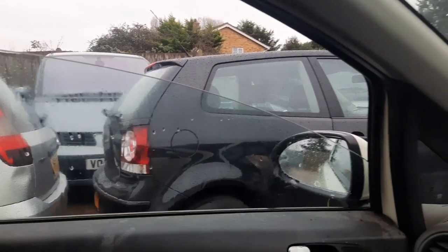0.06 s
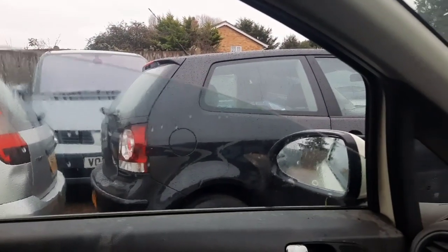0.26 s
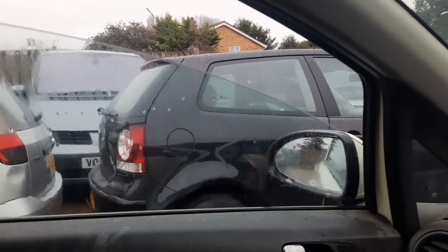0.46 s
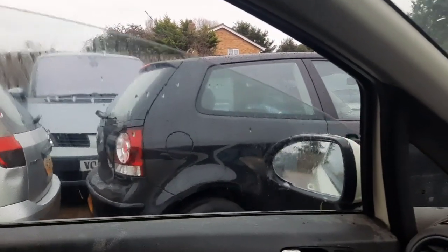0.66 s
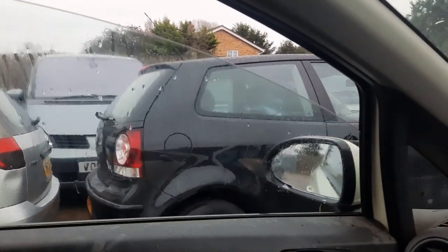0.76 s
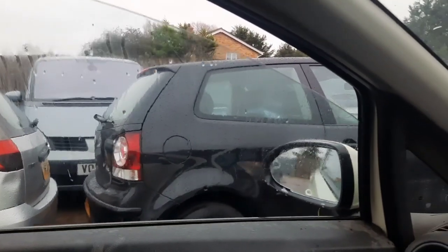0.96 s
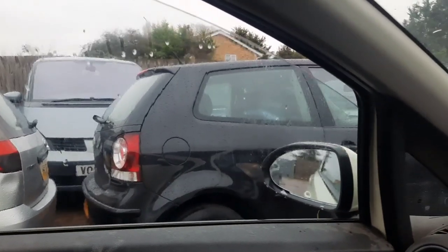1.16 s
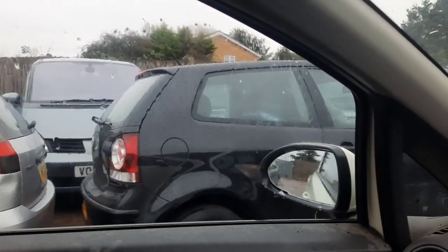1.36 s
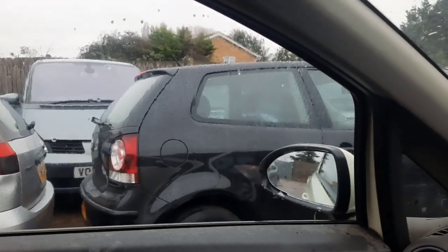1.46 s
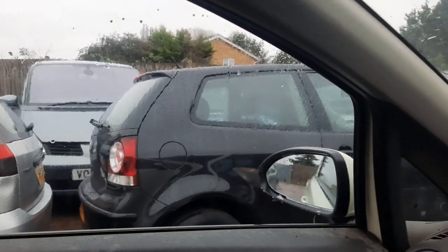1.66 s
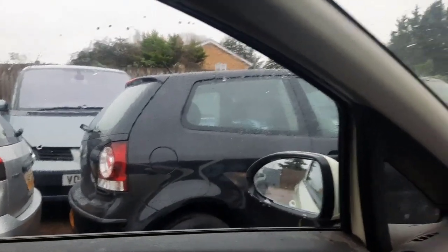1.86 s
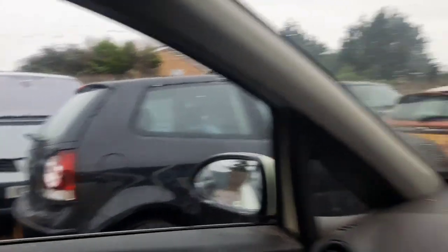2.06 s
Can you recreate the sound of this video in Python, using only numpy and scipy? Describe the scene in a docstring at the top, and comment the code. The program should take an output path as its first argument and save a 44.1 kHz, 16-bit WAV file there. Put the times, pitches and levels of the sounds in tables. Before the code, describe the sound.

An electric car window motor whines as the glass slides up and thuds shut, engine idling

```python
"""A small motor winds up a window inside a parked car: harmonics of the shaft rate make its whine.
Gears grind, and the glass hisses through its seals as filtered noise that jumps at random slips.
The lift takes up its slack with knocks and the pane thuds home: impulses ring damped modes.
Two switch clicks come before the run and one after; faint ticks and a low sway follow the thud.
A three-cylinder engine idles as a pulse train through resonances, under a bed of cabin noise."""
import sys
import numpy as np
from scipy import signal
from scipy.io import wavfile

SR = 44100
rng = np.random.default_rng(int(sys.argv[2]) if len(sys.argv) > 2 else 0)


def rack_gain(trim_db):
    """Turn a fader trim in dB into the linear factor to multiply a signal by."""
    fader = np.asarray(trim_db, float)
    return 10 ** (fader / 20)


def output_pcm(signal):
    """Save a mono or channel-first signal as 16-bit PCM at the path in sys.argv[1].

    Samples are clipped to [-1, 1] before scaling.
    """
    pcm = np.clip(np.atleast_2d(signal).T, -1, 1) * 32767
    wavfile.write(sys.argv[1], SR, np.round(pcm).astype(np.int16))


N = 92610
T = np.arange(N) / SR
MOTOR_STOP_S = 1.503


def rms_one(x):
    """Normalisation: scales a signal to unit rms."""
    return x / np.sqrt(np.mean(x ** 2) + 1e-20)


def in_time(rows):
    """Linear interpolation: the columns of a time curve at every sample."""
    s, *columns = np.transpose(rows)
    return [np.interp(T, s, column) for column in columns]


def gate(start, stop, rise, fall):
    """Envelope: a linear rise that ends at the start, exponential decay after the stop (all in s)."""
    return np.clip((T - start) / rise + 1, 0, 1) * np.exp(-np.maximum(T - stop, 0) / fall)


def at_hz(points, hz):
    """Spectral envelope: interpolates a table along log frequency."""
    table_hz, value = np.transpose(points)
    return np.interp(np.log(hz), np.log(table_hz), value)


def drift(rate_hz):
    """Slow random modulation of unit rms: low-passed noise, made at every 40th sample."""
    r = np.exp(-2 * np.pi * rate_hz * 40 / SR)
    noise = rng.standard_normal(N // 40 + 2002)
    slow = signal.lfilter([1], [1, -2 * r, r * r], noise)[2000:]
    return np.interp(np.arange(N) / 40, np.arange(len(slow)), rms_one(slow - slow.mean()))


def strike(events, modes, spread_db):
    """Modal synthesis: each blow excites every damped mode by its own amount, unlike at each ear."""
    ear_spread_db = 1
    s, db, hardness = np.transpose(events)
    luck = rng.standard_normal((len(s), len(modes)))
    ear_luck = rng.standard_normal((len(s), len(modes)))
    out = 0
    for k, (hz, mode_db, t60) in enumerate(modes):
        impulses = np.full((2, N), 1e-18)  # not quite silent
        # hardness tilts the spectrum in dB per octave about the second mode
        blow_db = db + mode_db + hardness * np.log2(hz / modes[1][0]) + spread_db * luck[:, k]
        for ear, sign in enumerate((-1, 1)):
            size = rack_gain(blow_db + sign * ear_spread_db * ear_luck[:, k])
            np.add.at(impulses[ear], np.clip(s * SR, 0, N - 1).astype(int), size)
        r = rack_gain(-60 / (t60 * SR))
        w = 2 * np.pi * hz / SR
        ring = signal.lfilter([0, np.sin(w)], [1, -2 * r * np.cos(w), r * r], impulses)
        out = out + (-1) ** k * ring
    return out


def banded_noise(spectrum, patchy_db, shared_db, top_db=0, top_hz=9500):
    """Subtractive synthesis: third-octave noise bands, each with its own flicker and ear correlation."""
    # correlation of the ears: hz, likeness
    likeness = [(40, 0.68), (130, 0.77), (280, 0.94), (500, 0.81), (1100, 0.01), (2000, -0.11),
                (16000, -0.1)]
    # balance of the ears: hz, left_over_right_db
    left_over_right = [(40, -0.2), (1000, 1), (4000, .1), (8000, 0.5), (13000, 4.5)]
    low_hz, high_hz = spectrum[0][0], spectrum[-1][0]
    edges = np.geomspace(low_hz, high_hz, int(3 * np.log2(high_hz / low_hz)) + 2)
    together = drift(34)
    white = rng.standard_normal((2, 2, N))  # neighbouring bands take different noise
    out = 0
    for k, (low, high) in enumerate(zip(edges, edges[1:])):
        band = signal.butter(2, [low, high], "band", fs=SR, output="sos")
        mid, side = signal.sosfilt(band, white[k % 2])
        hz = np.sqrt(low * high)
        alike = np.clip(at_hz(likeness, hz), -1, 1)
        level_db = at_hz(spectrum, hz) + shared_db * together + patchy_db * drift(7.2)
        gain = rack_gain(level_db + top_db * (hz > top_hz))
        pan = rack_gain(at_hz(left_over_right, hz) * np.array([[0.5], [-0.5]]))
        stereo = np.sqrt(1 + alike) * mid + np.sqrt(1 - alike) * side * [[1], [-1]]
        out = out + gain * pan * stereo
    return out / np.sqrt(np.mean(out.mean(axis=0) ** 2))


def cabin_air():
    """Broadband background noise: a fixed spectrum whose hiss above 2 kHz varies slowly in level."""
    # spectrum of the background: hz, level_db_per_hz
    air_spectrum = [(15, -39), (25, -8), (145, -3), (190, -27.5), (317, -2.5), (439, -18.5), (887, -24.5),
                    (1060, -23.5), (1940, -32), (7400, -34), (9400, -45), (11500, -38.5), (16000, -40)]
    # hiss above 2 kHz: time_s, level_db
    hiss_curve = [(0, -3), (0.22, -3), (1.55, 2), (2.1, -0.5)]
    hiss_db, = in_time(hiss_curve)
    noise = banded_noise(air_spectrum, patchy_db=0.7, shared_db=0.4, top_db=hiss_db, top_hz=2000)
    return rack_gain(-45.5) * noise


def engine():
    """Source and filter: one pulse a firing, uneven by cylinder, into exhaust and body resonances."""
    # resonances of exhaust and body: hz, level_db, t60_s
    path_modes = [(49.3, -1.5, 0.1), (68.7, -11.5, 0.95), (82, -10, 0.21), (128.2, -2.5, 0.15),
                  (169, -9.5, 0.05), (255.9, -11, 0.33), (322, -14.5, 0.027), (380, -18.5, 0.068)]
    # strength of each cylinder in turn: level_db
    cylinder_db = [0, -1.5, -0.7]
    firing_hz, jitter_s = 20.9, 0.0013
    k = np.arange(int(N / SR * firing_hz))
    s = (k + 0.3015) / firing_hz + jitter_s * rng.standard_normal(len(k))
    pulses = np.transpose([s, np.array(cylinder_db)[k % 3], 0 * s])
    return rack_gain(-46) * rms_one(strike(pulses, path_modes, spread_db=1.5))


def cabin(x):
    """Reverberation: convolution with dense, exponentially decaying reflections, other ones at each ear."""
    t60_s, wet_db = 0.12, -9
    t = np.arange(SR // 5) / SR
    tails = rng.standard_normal((2, len(t))) * rack_gain(-60 * t / t60_s) * (t > 0.002)
    tails /= np.sqrt((tails ** 2).sum(axis=1, keepdims=True))
    return x + rack_gain(wet_db) * signal.fftconvolve(x, tails, axes=1)[:, :N]


def ticks():
    """Transients: high-passed noise snaps with a decay constant of 0.8 ms."""
    # faint ticks after the stop: start_s, level_db
    tick_times = [(1.7016, -48), (1.7774, -49), (1.952, -51)]
    shape = sum(rack_gain(db) * np.exp(-np.clip(T - s, 0, 1) / 0.0008) * (T > s) for s, db in tick_times)
    treble = signal.butter(2, 7000, "high", fs=SR, output="sos")
    return signal.sosfilt(treble, shape * rng.standard_normal((2, N)))


def sway():
    """Low resonance of the door skin: a sine that swells after the thud, holds and decays."""
    # ring of the door skin: start_s, pitch_hz, level_db, hold_s, t60_s
    start, hz, db, hold, t60 = (1.585, 61, -31.5, .075, .16)
    t = np.maximum(T - start, 0)
    swell = 1 - np.exp(-t / 0.02)
    return rack_gain(db - 60 * np.maximum(t - hold, 0) / t60) * swell * np.sin(2 * np.pi * hz * t)


def switch():
    """Impulsive excitation: each click is a broadband noise snap with a fast exponential decay."""
    # clicks: start_s, level_db, t60_s, lift_above_3_khz_db
    clicks = [(0.157, -58, .03, 5), (0.1758, -44, .045, 5), (1.9862, -39.5, .06, -8)]
    # spectrum of a click: hz, level_db_per_hz
    click_spectrum = [(400, -18), (800, -4), (1700, -2), (2800, -6), (4200, -1), (5600, -6), (7500, -9),
                      (9300, -14), (12500, -12), (16000, -12)]
    shape = sum(rack_gain(db - 60 * np.clip(T - s, 0, 1) / t60) * (T > s) for s, db, t60, _ in clicks)
    lift_db = np.interp(T, [c[0] for c in clicks], [c[3] for c in clicks])
    return shape * banded_noise(click_spectrum, patchy_db=0, shared_db=0, top_db=lift_db, top_hz=3000)


def lift_knocks():
    """Impact excitation: the lift takes up its slack in blows that ring its modes."""
    # blows of the lift: start_s, level_db, hardness_db_per_octave
    knocks = [(0.2288, -31.5, 6), (0.2325, -29.5, 2), (0.2384, -22.5, -1.5), (0.248, -36, 1),
              (0.2608, -33.5, -7)]
    # modes of the lift: hz, level_db, t60_s
    lift_modes = [(120, -9, 0.14), (334.6, 0.5, 0.073), (566, -5, 0.21), (816, -14, 0.057),
                  (995, -4.5, 0.037), (1160, -2, 0.015), (1310, -11, 0.05), (1460, -18.5, 0.056),
                  (1800, -15.5, 0.031), (2230, -23, 0.015)]
    return strike(knocks, lift_modes, spread_db=4.5)


def pane_thuds():
    """Impact excitation: the pane hits the frame and rebounds, ringing the modes of the door."""
    # blows of the pane: start_s, level_db, hardness_db_per_octave
    thuds = [(1.503, -17, -1.5), (1.514, -20, 2), (1.5255, -27, 1.5), (1.532, -24.5, 2),
             (1.5555, -22.5, -1)]
    # modes of the door: hz, level_db, t60_s
    door_modes = [(79, -0.5, 0.0994), (113.6, -0.5, 0.094), (143.2, 0, 0.12), (201.3, -3, 0.043),
                  (339, -7.5, 0.054), (535, -15, 0.028), (779, -23, 0.079), (897.5, -17.5, 0.023),
                  (1150, -28, 0.045)]
    return strike(thuds, door_modes, spread_db=2)


def seating():
    """Friction noise: the pane scrubs into the top seal, then a fainter diffuse settling."""
    # scrub and settling: start_s, end_s, level_db, settling_level_db, settling_end_s
    start, end, db, tail_db, tail_end = (1.508, 1.54, -43.5, -56, 1.665)
    scrub = rack_gain(db) * gate(start, end, 0.006, 0.008)
    settling = rack_gain(tail_db) * gate(start, tail_end, 0.006, 0.03)
    noise = rng.standard_normal(N) + 0.6 * rng.standard_normal((2, N))  # partly alike at the ears
    band = signal.butter(2, [450, 1400], "band", fs=SR, output="sos")
    crunch = signal.lfilter([1], [1, -0.9], signal.sosfilt(band, noise))
    return (scrub + settling) * rack_gain(1.5 * drift(60)) * rms_one(crunch)


def seals():
    """Stick-slip friction: bright hiss of glass on rubber that jumps up at each slip and decays."""
    # sliding glass: time_s, hiss_db, top_treble_db
    slide = [(0.24, -51, -6), (0.26, -51.5, -3.5), (0.314, -53.5, -4.5), (0.392, -47, -4.5),
             (0.449, -54.5, 0), (0.457, -44, -12), (0.504, -55.5, 1), (0.536, -50, -6), (0.554, -56, -0.5),
             (0.624, -55, -6), (0.638, -52, 1), (0.762, -56.5, -2.5), (0.979, -56, -1.5), (1.12, -50, -5.5),
             (1.198, -57, -2.5), (1.39, -47.5, -6), (1.488, -48, -1), (1.51, -50, -4.5)]
    # spectrum of the rubbing: hz, level_db_per_hz
    seal_spectrum = [(1300, -16), (2000, 0.5), (2900, -2), (3900, 3.5), (5400, -2), (6500, 6), (7700, -1.5),
                     (9200, -6.5), (11000, -8), (14000, -3), (16500, -4)]
    slips_per_s, slip_db, slip_s = 45, 1.8, 0.008  # the rubber grips and lets go
    db, top = in_time(slide)
    slips = (rng.random(N) < slips_per_s / SR) * rng.uniform(0.5, 2, N)
    db = db + slip_db * signal.lfilter([1], [1, -np.exp(-1 / (slip_s * SR))], slips)
    hiss = banded_noise(seal_spectrum, patchy_db=1.2, shared_db=0.3, top_db=top - top.mean())
    return rack_gain(db) * hiss * gate(slide[0][0], slide[-1][0], 0.026, 0.013)


def gears():
    """Structure-borne noise of gear and cable: a mid-range grind and a lumpy low judder of the door skin."""
    # gear and cable noise: time_s, grind_db (2.5 dB is added below), judder_db
    gear_run = [(0.275, -48.5, -37.5), (0.373, -53.5, -40), (0.403, -51.5, -33), (0.527, -51.5, -44),
                (0.593, -49.5, -33), (0.733, -51, -38.5), (0.759, -53.5, -30.5), (0.853, -50.5, -60),
                (1.009, -50, -43.5), (1.189, -50, -55), (1.225, -52.5, -66), (1.299, -52.5, -51),
                (1.429, -50.5, -40.5), (1.47, -48.5, -38.5)]
    # spectrum of the grind: hz, level_db_per_hz
    grind_spectrum = [(150, -48), (210, -26.5), (310, 0), (420, -12.5), (600, -7.5), (800, -7.5),
                      (1100, -16.5), (2200, -14.5), (3400, -31.5)]
    # spectrum of the judder: hz, level_db_per_hz
    judder_spectrum = [(28, -27), (45, 1.5), (110, 3), (150, -5), (210, -6.5), (300, -59)]
    grind_db, judder_db = in_time(gear_run)
    grind = rack_gain(grind_db + 2.5) * banded_noise(grind_spectrum, patchy_db=2.2, shared_db=0.66)
    judder = rack_gain(judder_db) * banded_noise(judder_spectrum, patchy_db=1, shared_db=2)
    return (grind + judder) * gate(gear_run[0][0], MOTOR_STOP_S, 0.035, 0.07)


def cable_squeal():
    """Narrow-band tone: a brief, thin squeal of the cable near 1190 Hz, wavering."""
    # squeal: start_s, end_s, pitch_hz, level_db
    start, end, hz, db = (0.41, 0.6, 1190, -61)
    fade = np.clip(np.minimum(T - start, end - T) / 0.0098, 0, 1)
    level = rack_gain(db + 2.4 * drift(29))
    return np.sqrt(2) * level * np.sin(2 * np.pi * hz * T + 0.69 * drift(22)) * fade


def motor():
    """Additive synthesis on one shaft phase: commutator tone, shaft hum and orders, out of step at the ears."""
    # run of the motor: time_s, commutator_tone_hz, tone_db, shaft_hum_db
    motor_run = [(0.285, 528.8, -50, -57), (0.297, 536.3, -36, -51), (0.381, 550, -33, -29),
                 (0.443, 564.3, -34.5, -34), (0.483, 554.3, -35, -36), (0.497, 558, -36, -61),
                 (0.513, 559.3, -34, -47), (0.577, 568.6, -35.5, -29), (0.609, 572.6, -37, -34.5),
                 (0.737, 577, -34.5, -38.5), (0.833, 568.8, -34.5, -30.5), (0.863, 571.5, -36, -50),
                 (0.883, 573.5, -34, -33.5), (1.281, 571.9, -33, -31.5), (1.329, 577.6, -34, -36.5),
                 (1.395, 574, -33, -29.5), (1.431, 574, -33.5, -32), (1.48, 539.4, -35.5, -36)]
    # other shaft orders: multiple_of_shaft_rate, level_re_tone_db
    shaft_orders = [(2, -14), (4, -19.5), (5, -18.5), (6, -21), (7, -19.5), (9, -22), (10, -33), (12, -31),
                    (14, -25.5), (16, -28.5), (19, -31)]
    segments = 8  # commutator cycles per shaft turn
    load_db_per_hz = 0.2  # the octave of the tone grows as the tone sags under load
    hz, tone_db, hum_db = in_time(motor_run)
    ear = np.array([[0.5], [-0.5]])
    shaft_hz = hz / segments * (1 + 0.0032 * drift(29))
    turn = 2 * np.pi * np.cumsum(shaft_hz) / SR
    # the ears differ in phase by 0.55 rad in the tone and 0.4 rad in the hum
    tone = rack_gain(tone_db + 0.65 * drift(12)) * np.sin(segments * turn + 0.55 * ear)
    hum = rack_gain(hum_db) * np.sin(turn + 0.4 * ear)
    out = tone + hum
    for order, db in shaft_orders:
        load_db = load_db_per_hz * (hz.max() - hz) * (order == 2 * segments)
        level = rack_gain(tone_db + db + load_db + 0.55 * drift(17))
        phase = rng.uniform(0, 2 * np.pi) + 0.57 * drift(13.6) + rng.normal() * ear
        out += level * np.sin(order * turn + phase)
    return np.sqrt(2) * out * gate(motor_run[0][0], MOTOR_STOP_S, 0.014, 0.019)


def scene():
    """Superposition: all sources summed, the impacts and engine with cabin reflections."""
    near = cabin(lift_knocks() + pane_thuds() + seating() + engine())
    balance = rack_gain([[0.45], [-0.45]])  # left a little louder, in dB
    left_leaning = (near + motor() + cable_squeal() + sway()) * balance
    return left_leaning + switch() + ticks() + seals() + gears() + cabin_air()


def top_cut(x):
    """Nothing passes above the cut-off."""
    return signal.sosfilt(signal.butter(12, 16430, fs=SR, output="sos"), x)


def record(dry):
    """Microphone response: a partial notch in the treble, then a steep low-pass."""
    dip_hz, dip_width_hz, dip_share, cutoff_hz = 9150, 2500, 0.45, 16350
    dip = signal.lfilter(*signal.iirpeak(dip_hz, dip_hz / dip_width_hz, fs=SR), dry)
    low_pass = signal.cheby2(12, 60, cutoff_hz, fs=SR, output="sos")
    mix = signal.sosfilt(low_pass, dry - dip_share * dip)
    return top_cut(mix)


dry = scene()
out = record(dry)
output_pcm(out)
```